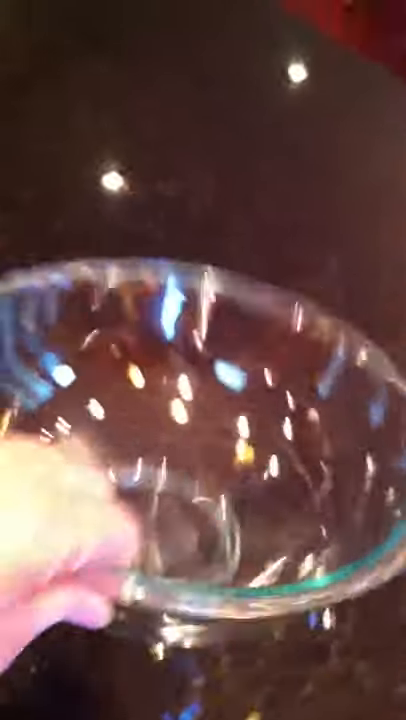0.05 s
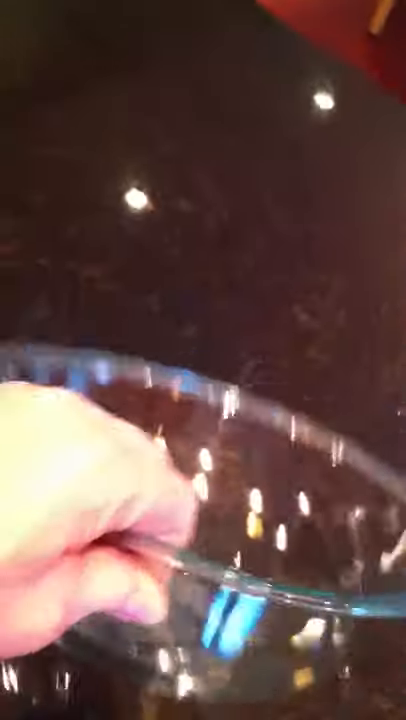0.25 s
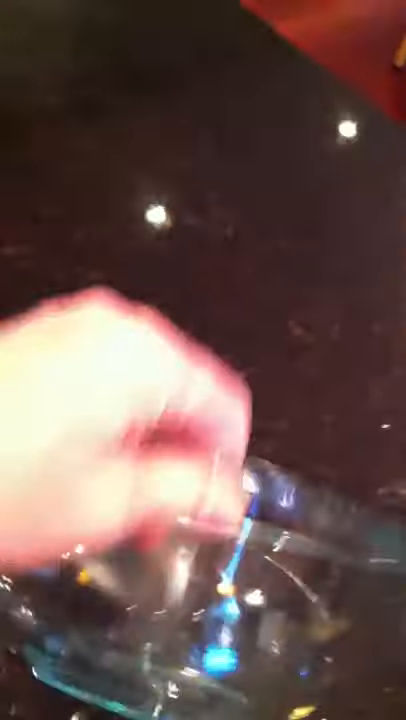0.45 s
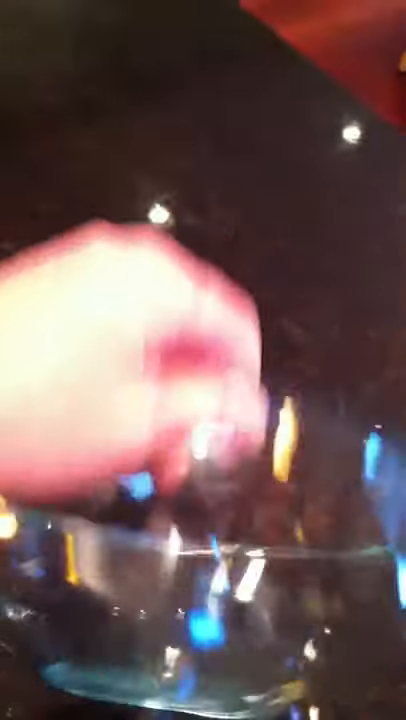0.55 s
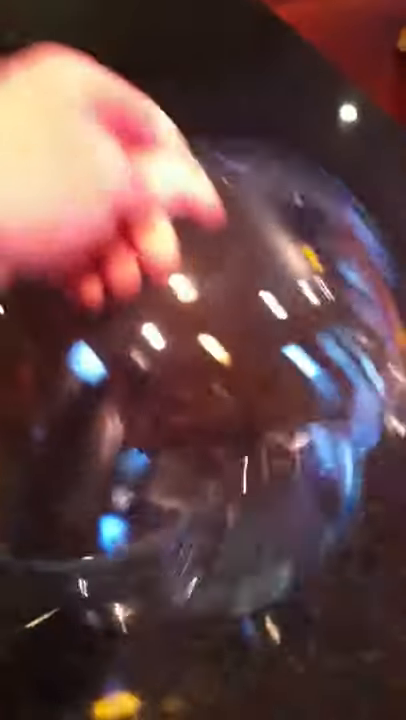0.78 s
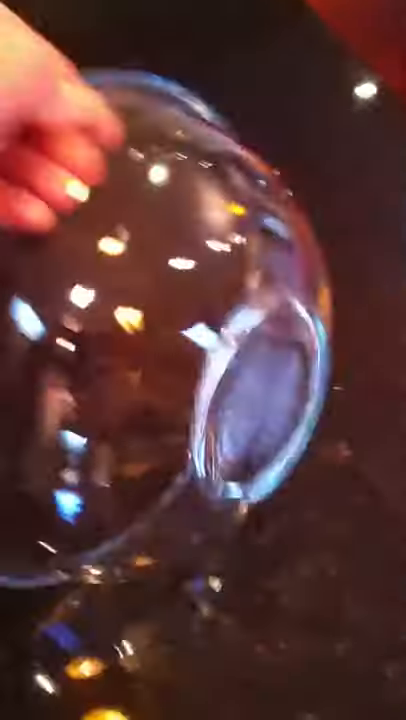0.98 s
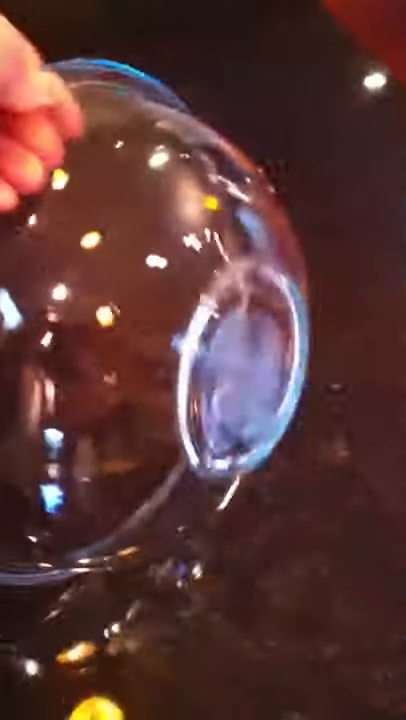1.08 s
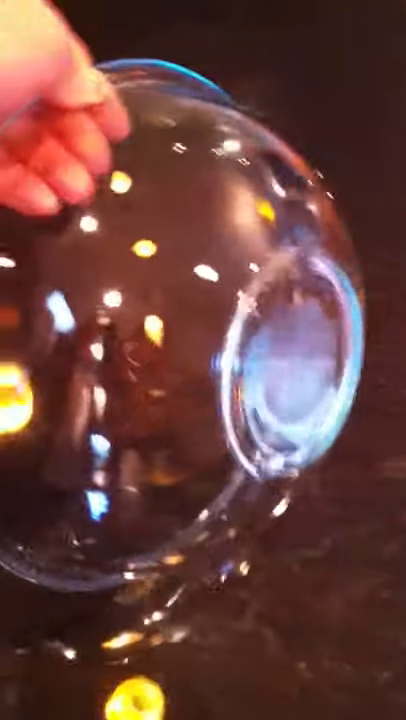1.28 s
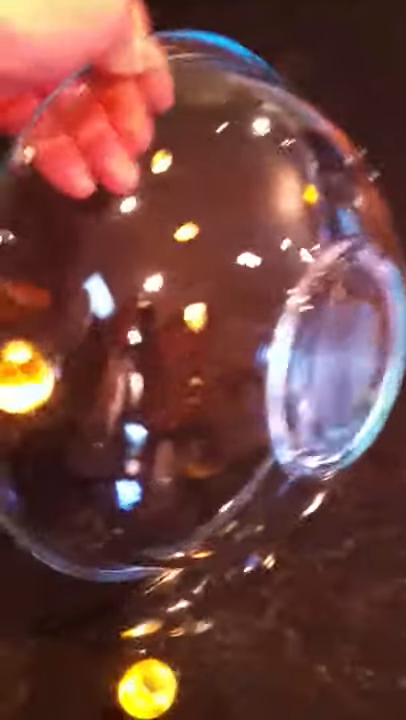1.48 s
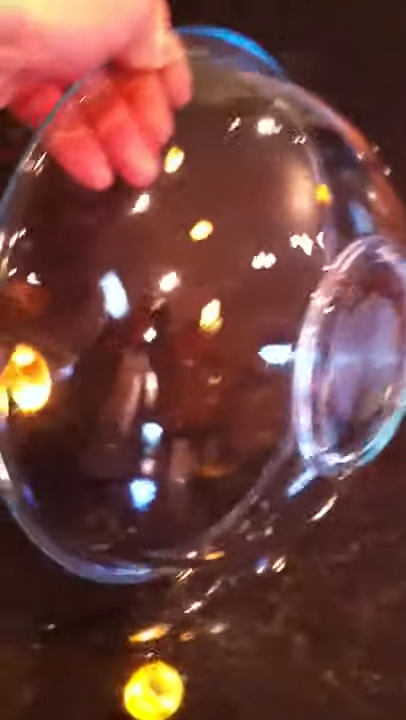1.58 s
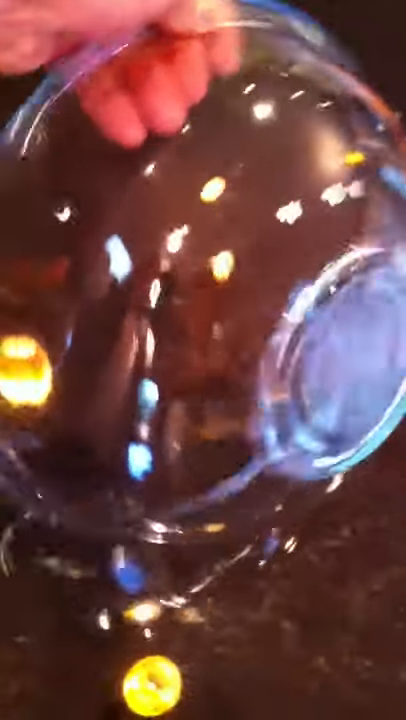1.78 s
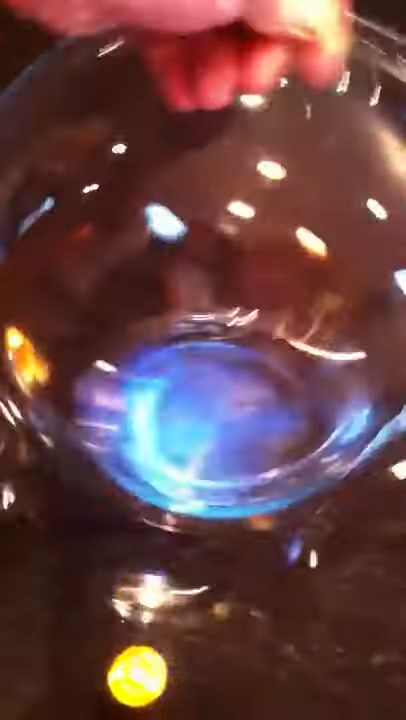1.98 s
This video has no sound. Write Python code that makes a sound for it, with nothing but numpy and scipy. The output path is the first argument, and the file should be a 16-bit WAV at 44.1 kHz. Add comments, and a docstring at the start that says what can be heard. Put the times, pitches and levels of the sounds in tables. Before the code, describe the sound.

A glass bowl tips over on a stone counter: a brief low rolling groan, a dull knock, then a bright clack that rings briefly. Faint bumps follow as it is turned, heard close in a quiet, hard-walled room.

```python
"""A low falling groan, a dull knock, then a bright clack: a glass bowl tipped over on a stone counter.
It groans as it rolls on its foot, knocks as it drops onto its side, then strikes in a quick chatter.
The hand damps the glass, and the quiet, hard-walled room carries the ring.
Faint bumps, a light rub and thin whistles follow as the bowl is turned."""
import sys
import numpy as np
from scipy import signal
from scipy.fft import rfft, irfft
from scipy.io import wavfile
from scipy.ndimage import uniform_filter1d

SR = 44100
rng = np.random.default_rng(int(sys.argv[2]) if len(sys.argv) > 2 else 0)


def wrap_up_sound(samples):
    """Save the sound to the file named by the first command line argument, as 16-bit audio."""
    columns = np.atleast_2d(samples).T
    # keep every value between -1 and 1, then stretch to whole-number steps
    tamed = np.clip(columns, -1, 1)
    steps = np.round(tamed * 32767).astype(np.int16)
    wavfile.write(sys.argv[1], SR, steps)


N = 90404
TIME = np.arange(N) / SR

# the drop onto the side and its rebound (time [s], strength [dB])
KNOCK_HITS = [(0.2273, 2), (0.2341, -12)]
# the chatter of glass on stone that makes the clack (time [s], strength [dB])
CLACK_HITS = [(0.5633, -0.5), (0.5650, 6), (0.5661, -0.5)]


def amp(db):
    """Decibels to gain."""
    return 10 ** (np.asarray(db) / 20)


def unit(x):
    """Scales to rms 1."""
    return x / np.sqrt(np.mean(x ** 2) + 1e-20)


def spectrum_at(points, hz):
    """Reads a spectrum on a log-frequency axis."""
    freqs, values = np.transpose(points)
    return np.interp(np.log(hz + 1), np.log(freqs), values)


def follow(points, column=1):
    """Reads a time curve at every sample."""
    rows = np.array(points)
    return np.interp(TIME, rows[:, 0], rows[:, column])


def through(x, response):
    """Convolves and cuts to length."""
    return signal.fftconvolve(x, response)[:N]


def low_cut(x, hz=120):
    """Takes out the deep bass."""
    return signal.sosfilt(signal.butter(3, hz, "highpass", fs=SR, output="sos"), x)


def noise(colour):
    """Steady noise of a given colour, at rms 1."""
    gain = amp(spectrum_at(colour, np.fft.rfftfreq(N, 1 / SR)))
    return unit(irfft(rfft(rng.standard_normal(N)) * gain, N))


def clicks(rows):
    """One impulse for each (time [s], level [dB])."""
    out = np.zeros(N)
    for time, db in rows:
        out[round(time * SR)] += amp(db)
    return out


def contact(colour, resonances=(), size=4096):
    """The minimum-phase pulse of one contact, with its colour and broad resonances."""
    hz = abs(np.fft.fftfreq(size, 1 / SR))
    peaks_db = sum(boost / (1 + ((hz - centre) / width) ** 2) for centre, width, boost in resonances)
    log_gain = np.log(amp(spectrum_at(colour, hz) + peaks_db))
    spectrum = np.exp(np.conj(signal.hilbert(log_gain)))
    return np.fft.ifft(spectrum).real[:size // 2]


def ring(hz, t60):
    """One dying mode."""
    return np.sin(2 * np.pi * hz * TIME) * np.exp(-np.log(1000) * TIME / t60)


def resonator(hz, db, t60):
    """A mode scaled to a gain of db at its own pitch."""
    return amp(db) * 2 * np.log(1000) / (t60 * SR) * ring(hz, t60)


def diffuse(t60s, levels, rise_s=.0034, size=256):
    """Dense random reflections build up quickly; each band dies at its own speed."""
    hz, time, bands = signal.stft(rng.choice([-1., 1.], N), SR, nperseg=size)
    rate = np.log(1000) / spectrum_at(t60s, hz)[:, None]
    gain = np.sqrt(2 * rate / SR) * amp(spectrum_at(levels, hz))[:, None]
    tail = signal.istft(bands * gain * np.exp(-rate * time), SR, nperseg=size)[1][:N]
    return tail * (1 - np.exp(-TIME / rise_s))


def room(x):
    """Hard walls return early reflections, low resonances and a tail; things on the counter scatter."""
    # early reflections (delay [s], level [dB])
    echoes = [(.0052, -23.5), (.0098, -12), (.0155, -14.5), (.0177, -26.5), (.0254, -10)]
    # low resonances of room and counter (frequency [Hz], relative gain [dB], t60 [s])
    low_modes = [(205, 8, .62), (250, 5, .55), (321, 9, .5), (430, 5, .4), (524, 7, .45), (587, 6, .45),
                 (646, 6.5, .45), (974, 6, .5), (1041, 7, .5), (1096, 9, .4), (1241, 5, .5)]
    # decay of the tail (frequency [Hz], t60 [s])
    tail_decay = [(150, 0.44), (400, 0.625), (1000, 0.8544), (2500, 0.7), (6000, 0.77), (10000, 0.34),
                  (16000, 0.44)]
    # colour of the tail (frequency [Hz], level [dB])
    tail_colour = [(100, -9), (300, 2.5), (1000, -8), (2500, -1), (6000, -3.5), (14000, 0)]
    standing = sum(resonator(hz, db + 1.5, t60) for hz, db, t60 in low_modes)
    scatter = diffuse(t60s=[(1, .09)], levels=[(1, -1)])  # short, alike in every band
    tail = diffuse(tail_decay, tail_colour)
    return through(x, clicks(echoes) + standing + low_cut(scatter + tail))


def room_tone():
    """Low room noise and hiss; the low noise sinks slowly from the start, the hiss around the clack, and both
    slowly return."""
    # colour of the low noise (frequency [Hz], relative level [dB])
    murk_colour = [(25, -24.5), (90, -16.5), (190, 1), (350, -1), (700, -5.5), (1500, -9.5), (3500, -13.5),
                   (8000, -30), (17000, -39.5)]
    # its fade (time [s], level [dB])
    murk_fade = [(0, -63), (.9, -67), (1.25, -71.5), (1.55, -70), (1.8, -67.5), (2.05, -64)]
    # colour of the hiss (frequency [Hz], relative level [dB])
    hiss_colour = [(25, -12.5), (1000, -1), (4000, 1), (9000, 4.5), (13000, 3), (17000, -1)]
    # its fade (time [s], level [dB])
    hiss_fade = [(0, -59.5), (.53, -59.5), (.9, -68), (1.15, -73), (1.45, -71), (1.65, -69.5), (2.05, -65)]
    return noise(murk_colour) * amp(follow(murk_fade)) + noise(hiss_colour) * amp(follow(hiss_fade))


def whistles(waver_depth=.004, blur_depth=.02, flutter_db=4):
    """Very faint high tones that glide upward, waver and fade in and out."""
    # one glide per whistle (time [s], pitch [Hz], level before flutter [dB])
    glides = [
        [(1.44, 8730, -89.5), (1.49, 10400, -77), (1.6, 11740, -76.5), (1.66, 12700, -69), (1.73, 13020, -85)],
        [(1.61, 14000, -81.5), (1.66, 14950, -70), (1.73, 15400, -64), (1.86, 16630, -77), (1.94, 15850, -62.5),
         (2.04, 16300, -84.5)],
    ]
    out = np.zeros(N)
    for glide in glides:
        waver, flutter = unit(uniform_filter1d(uniform_filter1d(rng.standard_normal((2, N)), 600), 300))
        blur = unit(uniform_filter1d(rng.standard_normal(N), 15))  # fast jitter makes the tone breathy
        hz = follow(glide) * (1 + waver_depth * waver + blur_depth * blur)
        level = amp(follow(glide, 2) + flutter_db * (flutter - .5))
        sounding = (TIME > glide[0][0]) & (TIME < glide[-1][0])
        out += sounding * level * np.sin(2 * np.pi * np.cumsum(hz) / SR)
    return out


def rubbing():
    """The bowl rubs faintly on the counter as it is turned."""
    # colour of the friction (frequency [Hz], relative level [dB])
    colour = [(200, -30.5), (1200, -9), (2000, 1.5), (2600, -11.5), (3300, -2.5), (4500, -13.5),
              (9500, -10.5), (16000, -17)]
    # its swell (time [s], level [dB])
    swell = [(0, -100), (1.45, -89.5), (1.68, -69.5), (2.05, -70)]
    return noise(colour) * amp(follow(swell))


def bumps(wet_db=-2):
    """Small soft contacts as the bowl is turned."""
    # the touches (time [s], strength [dB])
    touches = [(.921, -21), (1.356, -19.5), (1.408, -17.5)]
    # their muffled colour (frequency [Hz], level [dB])
    colour = [(50, -22), (140, -28), (230, -6), (400, -3.5), (800, -15.5), (2000, -18), (8000, -29.5),
              (16000, -40)]
    direct = through(clicks(touches), contact(colour))
    return direct + amp(wet_db) * room(direct)


def rolling(width_hz=110, evenness=.4, grit_db=-12.5, sing_db=-28.5, wet_db=-5):
    """Roughness under the foot drives a resonance that sinks as the bowl tips; the glass sings faintly."""
    # the roll on the foot (time [s], level [dB], pitch [Hz])
    roll = [(0, -50.5, 570), (.05, -53.5, 590), (.09, -47.5, 564), (.106, -38.5, 648), (.13, -42.5, 480),
            (.154, -48, 460), (.17, -34.5, 435), (.214, -41.5, 430), (.23, -46.5, 430), (.3, -90, 430)]
    # grit under the foot (frequency [Hz], relative level [dB])
    grit_colour = [(60, -44.5), (150, -23.5), (300, 0), (450, -0.5), (1000, 1), (1400, -10.5),
                   (2500, -22.5), (8000, -27), (16000, -36.5)]
    # tones of the rubbed rim (frequency [Hz], relative level [dB])
    rim_tones = [(3575, 0), (4985, -2.5), (5346, -3.5), (7267, -3)]
    carrier = np.exp(2j * np.pi * np.cumsum(follow(roll, 2)) / SR)
    pole = np.exp(-np.pi * width_hz / SR)
    wander = signal.lfilter([1], np.poly([pole, pole]), rng.standard_normal(N) / carrier)
    groan = unit((carrier * wander / (abs(wander) + 1e-9) ** evenness).real)  # swells partly evened out
    rim = sum(amp(db) * ring(hz, t60=.35) for hz, db in rim_tones)
    singing = unit(through(rng.standard_normal(N), rim))
    texture = groan + amp(grit_db) * noise(grit_colour) + amp(sing_db) * singing
    direct = low_cut(amp(follow(roll)) * texture)
    return direct + amp(wet_db) * room(direct)


def shimmer(x, low_hz=3820, high_hz=15440, count=70):
    """The many weak, short upper modes of the glass, rung by a contact."""
    edges = np.linspace(low_hz, high_hz, count + 1)
    pitches = rng.uniform(edges[:-1], edges[1:])
    signs = rng.choice([-1., 1.], count)
    return through(x, sum(sign * resonator(hz, db=3.5, t60=.1) for hz, sign in zip(pitches, signs)))


def glass_ring(knock_gain_db=4, clack_gain_db=2, wet_db=-4):
    """Both blows ring the same modes of the bowl, in different shares; the hand cuts the ring short."""
    # bowl modes (frequency [Hz], share in the knock [dB], share in the clack [dB], undamped t60 [s])
    bowl_modes = [(1290, -42, -36, .55), (2168, -56, -31, .55), (3004, -60, -29, .52), (3073, -60, -31, .5),
                  (3555, -38, -42, .52), (4097, -60, -39, .5), (4872, -38, -42, .48), (5561, -35, -39, .38),
                  (5691, -35, -39, .38), (5896, -44, -33, .45), (6245, -42, -46, .36),
                  (6798, -52, -27, .33), (7246, -39, -46, .42), (7283, -40, -48, .38),
                  (8195, -38, -42, .28), (8263, -40, -44, .28), (8315, -45, -36, .3), (8699, -42, -43, .33),
                  (9295, -47, -40, .3), (9886, -37, -49, .27), (10385, -45, -42, .3),
                  (11160, -42, -48, .22), (11240, -42, -48, .2), (12700, -45, -50, .18),
                  (12870, -43, -46, .22), (14400, -49, -47, .19)]
    grip = .46  # share of its ring time that the held glass keeps
    signs = rng.choice([-1., 1.], (len(bowl_modes), 1))  # each mode starts inward or outward
    modes = signs * np.array([ring(hz, t60 * grip) for hz, _, _, t60 in bowl_modes])
    _, knock_db, clack_db, _ = np.transpose(bowl_modes)
    knock_ring = through(clicks([(KNOCK_HITS[0][0], knock_gain_db)]), amp(knock_db) @ modes)
    clack_ring = through(clicks([(CLACK_HITS[0][0], clack_gain_db)]), amp(clack_db) @ modes)
    direct = knock_ring + clack_ring
    return direct + amp(wet_db) * room(direct)


def blows(knock_wet_db=2.5, clack_wet_db=-4.5, shimmer_wet_db=-4):
    """Glass hits stone: a dull knock whose rebound pushes the other way, then a bright, chattering clack."""
    # dull colour of the knock (frequency [Hz], level [dB])
    knock_colour = [(30, -12.5), (130, -5), (210, 14), (330, 21), (390, 15.5), (480, 23), (630, 28),
                    (820, 23.5), (1090, 25), (1550, 16), (1900, 3), (3000, -5), (4500, -6.5), (7000, -2.5),
                    (10000, -10), (16000, -28.5)]
    # bright colour of the clack (frequency [Hz], level [dB])
    clack_colour = [(30, -12.5), (80, 0), (140, -11), (220, 15), (320, 16), (430, 5.5), (640, 14),
                    (950, 10), (1700, 16), (3600, 6.5), (4900, 1), (6500, 4), (8600, 2), (9800, -2.5),
                    (14500, -10), (17000, -18.5)]
    # peaks and dips of the bowl pressed on the counter (frequency [Hz], half-width [Hz], boost [dB])
    body = [(1423, 160, 15), (1735, 140, -17), (2125, 190, 16.5), (2504, 90, -11.5), (3120, 130, 16),
            (3430, 91, -6.5), (13500, 560, -7)]
    knock = through(clicks(KNOCK_HITS[1:]) - clicks(KNOCK_HITS[:1]), contact(knock_colour))
    clack = through(clicks(CLACK_HITS), contact(clack_colour, body))
    sparkle = shimmer(knock + clack)
    send = amp(knock_wet_db) * knock + amp(clack_wet_db) * clack + amp(shimmer_wet_db) * sparkle
    return knock + clack + sparkle + room(send)


def scene():
    """The tipping bowl over the room tone, in mono."""
    return (blows() + glass_ring() + rolling() + bumps() + rubbing() + whistles() + room_tone())[None]


def record(dry):
    """The peaks overload softly, then the very top of the treble is cut."""
    ceiling, cutoff_hz = .97, 17900
    squashed = ceiling * np.tanh(dry / ceiling)
    low_pass = signal.firwin(511, cutoff_hz, window=("kaiser", 9), fs=SR)
    return signal.oaconvolve(squashed, low_pass[None], "same")


dry = scene()
out = record(dry)
wrap_up_sound(out)
```